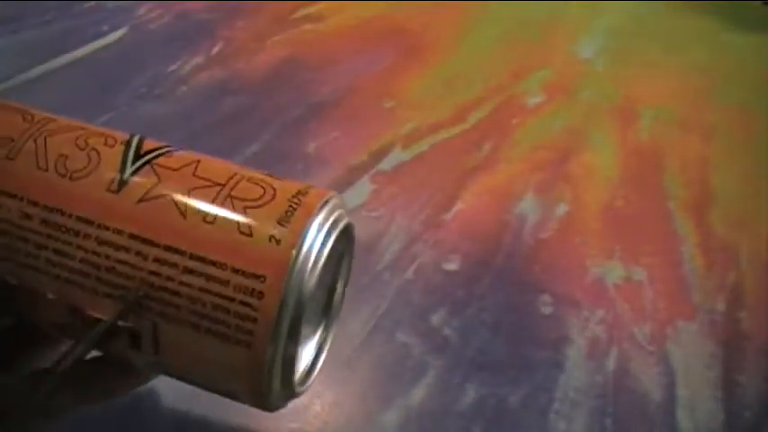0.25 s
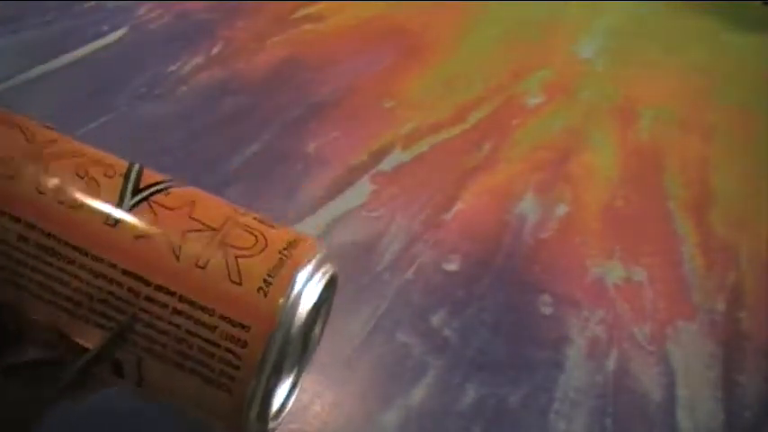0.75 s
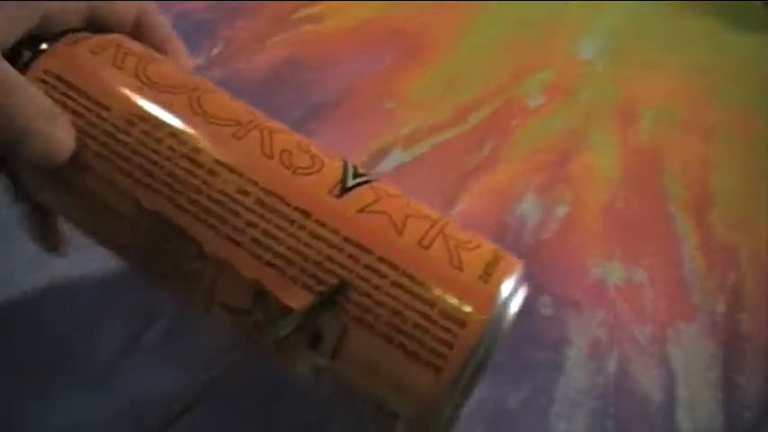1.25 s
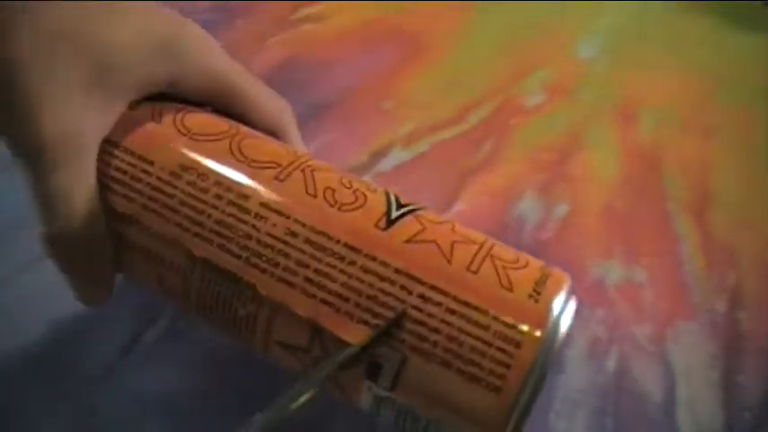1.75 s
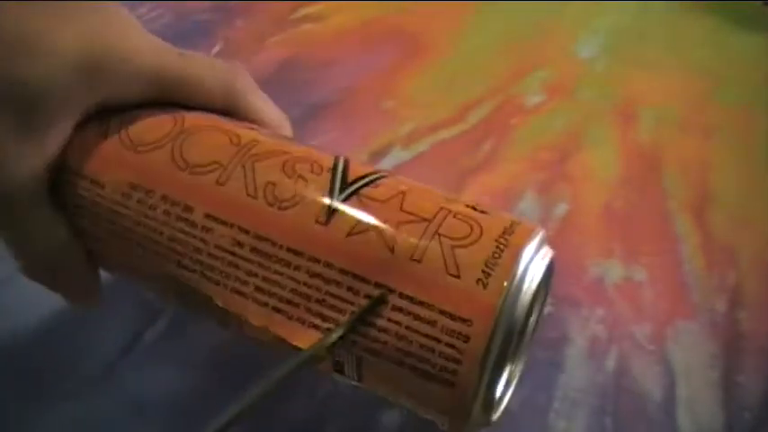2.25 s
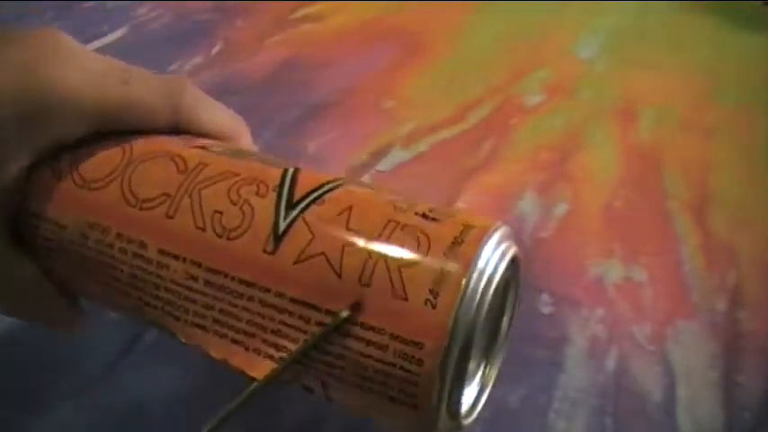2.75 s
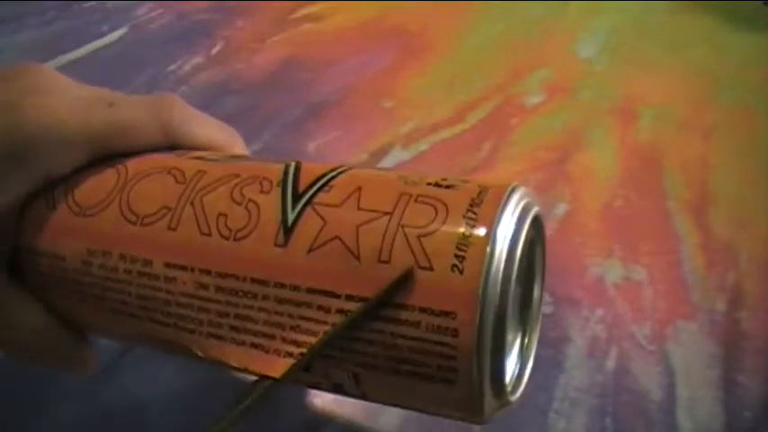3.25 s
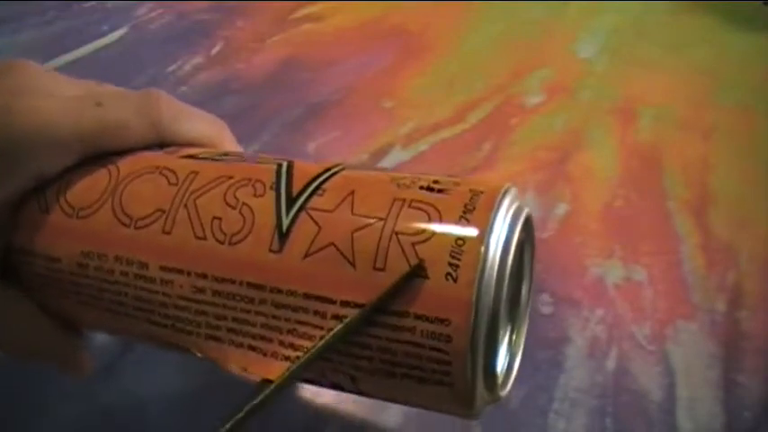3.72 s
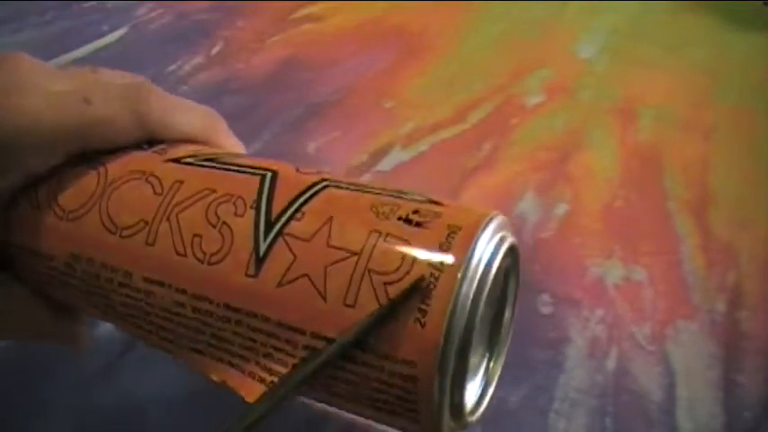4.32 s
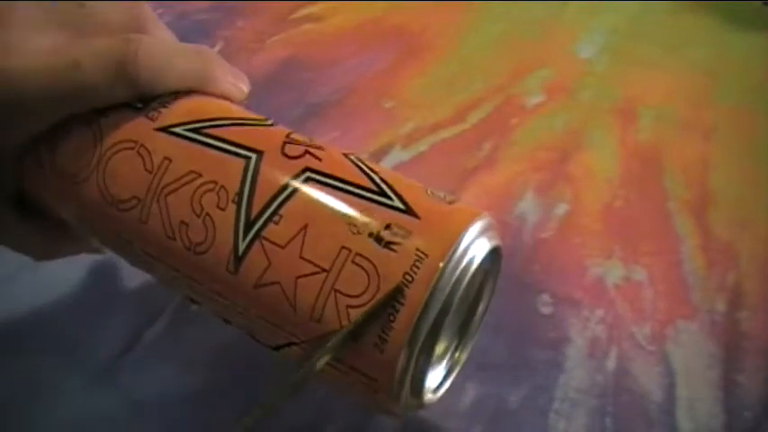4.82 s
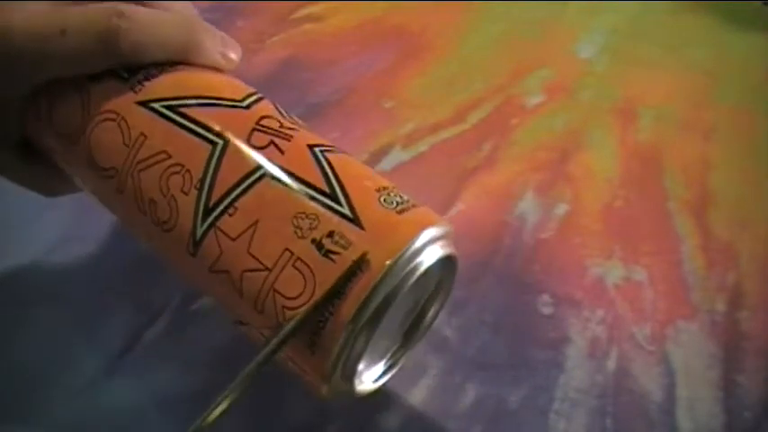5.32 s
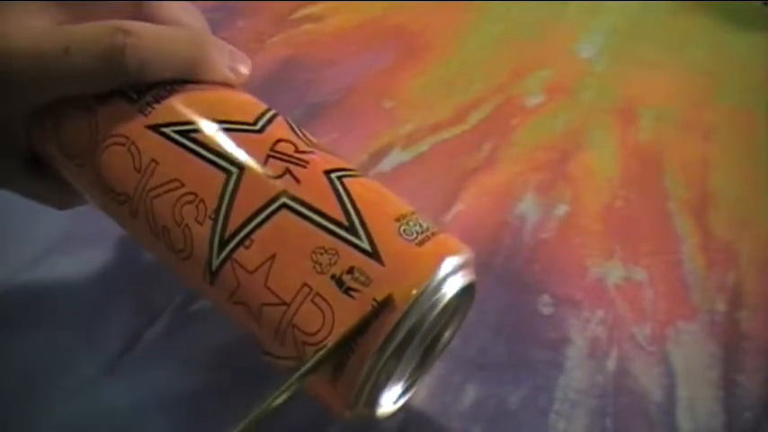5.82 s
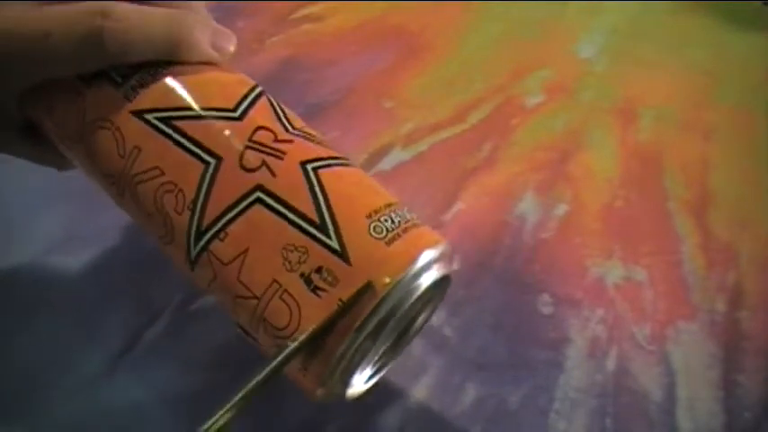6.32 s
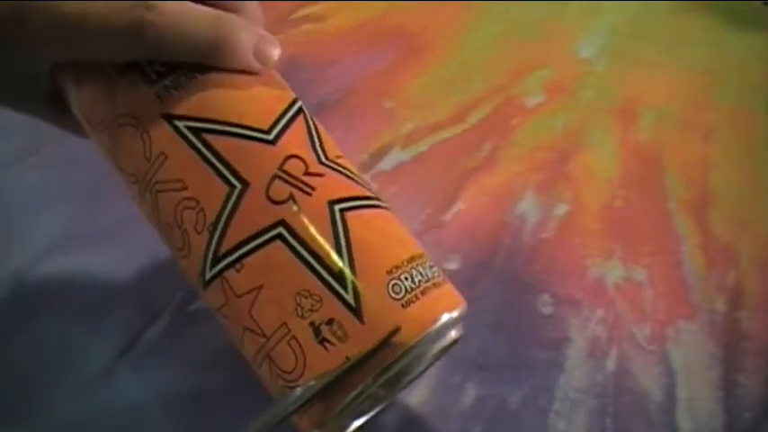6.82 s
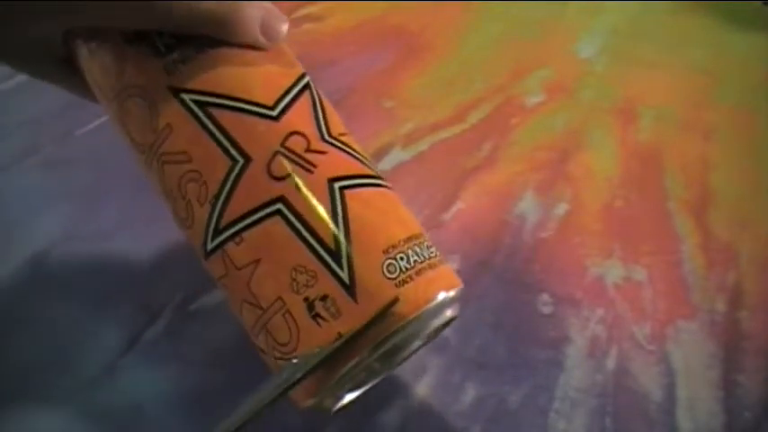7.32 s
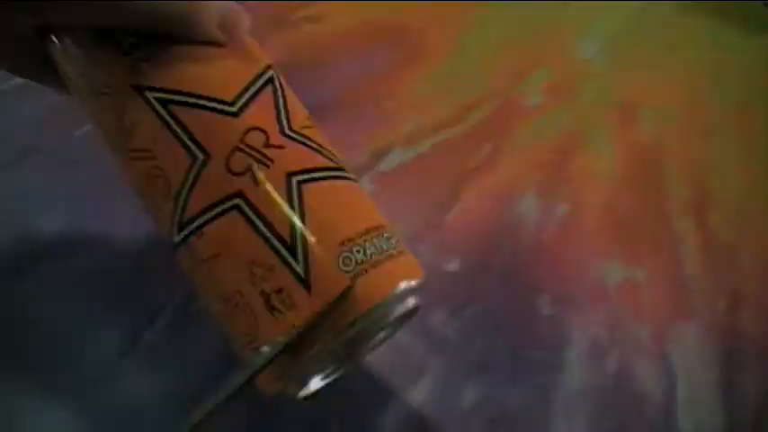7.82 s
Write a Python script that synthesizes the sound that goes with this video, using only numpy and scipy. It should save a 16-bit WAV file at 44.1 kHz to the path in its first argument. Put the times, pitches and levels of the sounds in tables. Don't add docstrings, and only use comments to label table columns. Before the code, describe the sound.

A close, dry-sounding metal can is cut by scissors in a small room, over constant faint hiss and low motor whir. A hollow click and short scrape open it, with light snips to 0.35 s. Two very loud tinny snaps hit near 0.65 and 0.69, then an airy hand rub runs until about 1.6, with pinging cracks at 1.04 and 1.19. Shearing strokes come at 1.8 to 2.05. From 2.2 to 3.5 it is busy: pops at 2.24 and 2.59, gritty rasps, small squeaks, a bright tear at 2.76, quick ticks. After a lull, cracks return at 3.86 and 3.94, a pop at 4.1, and sharp loud snaps from 4.36 to 4.76. Rapid small bites patter near 5.1, cracks at 5.63, snips to 6.0, a brief rub at 6.2, dull pops 6.4 to 6.6, a hard tear at 6.8, then loud cracks at 7.2, 7.44, 7.58 and 7.66, with a last pop at 8.0.

```python
import sys
import numpy as np
from scipy import signal
from scipy.fft import rfft, irfft, next_fast_len
from scipy.io import wavfile
from scipy.ndimage import uniform_filter1d

SR = 44100
rng = np.random.default_rng(int(sys.argv[2]) if len(sys.argv) > 2 else 0)


def unload_audio(sound):
    columns = np.transpose(np.atleast_2d(sound))
    steps = np.round(np.clip(columns, -1, 1) * 32767)
    wavfile.write(sys.argv[1], SR, steps.astype(np.int16))


def level_to_linear(level):
    exponent = np.asarray(level, float) / 20
    return 10 ** exponent


N = 355798

# frequency in Hz, level in dB per Hz.
HISS = [(24, -59), (60, -30), (100, -24), (181, -3), (417, -3.5), (707, -8.5), (763, -7), (957, -10),
        (2370, -16.5), (3050, -20.5), (3290, -22.5), (4800, -26), (6300, -31.5), (7000, -18.5), (7600, -26),
        (9400, -28), (10100, -24.5), (10800, -30), (16500, -62.5)]
HISS_DB = -52
# frequency in Hz, rms level in dB.
WHIR = [(117, -76), (175, -71.5), (217, -65), (292, -60), (351, -89.5), (409, -59.5), (466, -65),
        (526, -90.5), (3391, -73), (5480, -76.5), (15734, -98)]
# time in seconds, peak of the snap in dB, thud in dB.
THUDS = [(0.648, -5, -69), (0.69, 1, -69), (2.24, -5, -75), (2.586, -9, -69), (2.762, -10, -71),
         (3.859, 1, -68), (3.935, -7, -66), (4.357, 1, -48), (4.578, 0, -63), (4.633, 2, -68),
         (4.668, 6, -64), (4.76, 1, -70), (5.645, 0, -62), (6.437, -7, -77), (6.637, 4, -76),
         (7.192, 1, -73), (7.434, 1, -61), (7.575, 1, -78), (7.658, 0, -66), (8.0, -10, -76)]
# low edge in Hz, high edge in Hz, t60 in seconds, level in dB.
ROOM = [
    (196, 940, 0.54, -14.5),
    (1000, 3200, 0.35, -13.5),
    (3500, 7430, 0.34, -17),
    (7840, 20000, 0.31, -22.5),
]
# time in seconds, level in dB.
RUBS = [
    [(0.72, -45), (0.8, -42.5), (1.0, -44.5), (1.12, -54.5), (1.25, -43.5), (1.356, -51), (1.5, -40.5),
     (1.56, -56), (1.63, -61)],
    [(3.78, -70), (3.817, -58), (3.84, -72)],
    [(6.1, -59), (6.166, -68), (6.228, -45), (6.3, -53)],
    [(7.0, -88), (7.03, -79), (7.1, -49), (7.17, -72)],
]
# frequency in Hz, level in dB per Hz.
RUB_TONE = [(470, -57.5), (800, -39), (1300, 4), (2130, 4), (5000, 4), (6500, 2.5), (8500, 8), (11000, 0.5),
            (16000, -19)]

# frequency in Hz, level in dB.
METAL = [(50, -37.5), (200, -9), (330, -4), (450, 1), (1000, -4), (2500, -6.5), (5000, -4), (6700, -5.5),
         (8500, -1), (11000, -8.5), (13000, -13.5), (15800, -16), (16400, -41.5)]
# low edge in Hz, high edge in Hz, t60 after a snap in seconds.
BANDS = [
    (520, 2830, 0.063),
    (1230, 4800, 0.042),
    (5100, 13300, 0.033),
]
BODY, WALL, EDGE = BANDS
# frequency in Hz, level in dB, t60 in seconds.
CAN = [(782, -22, 0.058), (1100, -6.5, 0.21), (1340, -0.5, 0.0553), (2020, -13, 0.21), (2920, -7.5, 0.31),
       (4150, -7, 0.0091), (5120, -41, 0.18), (6420, -21, 0.041), (7340, -24.5, 0.16), (7400, -32, 0.16),
       (8183, -36.5, 0.97), (8840, -43.5, 5.0)]
CAN_SNAP_DB, CAN_STROKE_DB, CAN_SCATTER_DB = -13, -5, 10.5

# start in seconds, level in dB, pitch in Hz, t60 in
# seconds.
PINGS = [(.002, -24, 1950, .04), (.161, -35, 1940, .06), (.3, -37, 4650, .035), (.307, -28, 3050, .025),
         (.309, -31, 1960, .04), (.649, -29, 370, .05), (.649, -21, 2030, .05), (.691, -21, 2120, .05),
         (1.0432, -21, 2370, .04), (1.0442, -27, 1880, .05), (1.1882, -18, 9210, .028),
         (1.1886, -16, 3720, .025), (1.1892, -33, 3760, .07), (1.8152, -33, 480, .06),
         (1.8172, -22, 1885, .04), (1.9202, -22, 2920, .03), (1.9632, -23, 1410, .045),
         (1.9634, -33, 480, .08), (2.2212, -28, 2500, .025), (2.2412, -20, 1900, .055),
         (2.2792, -29, 2500, .03), (2.5862, -22, 810, .04), (2.5864, -22, 1400, .04),
         (2.5866, -28, 2010, .04), (2.5868, -28, 2700, .04), (2.5882, -30, 410, .1),
         (2.7752, -27, 3090, .09), (2.7802, -28, 420, .1), (3.0102, -32, 3000, .025),
         (3.0252, -33, 3000, .025), (3.3012, -33, 430, .05), (3.4702, -35, 2010, .06),
         (3.4712, -29, 3510, .05), (3.8602, -15, 8700, .018), (3.8612, -26, 2910, .03),
         (3.9352, -26, 1975, .045),
         (4.2802, -28, 1915, .15), (4.2902, -28, 470, .12), (4.5802, -16, 8800, .018),
          (4.6352, -29, 1275, .024), (4.6682, -27, 1310, .028), (4.6692, -23, 8260, .13),
          (4.6694, -35, 6400, .06), (5.4202, -41, 780, .04), (5.4502, -35, 830, .08),
          (5.4702, -34, 850, .06), (5.5002, -38, 700, .04), (5.6822, -23, 1088, .13),
          (5.6824, -30, 1490, .06), (5.6902, -29, 520, .06), (5.7632, -25, 1080, .07),
          (5.9992, -33, 445, .14), (6.0002, -27, 1100, .05), (6.3752, -23, 2890, .03),
          (6.3762, -25, 1985, .034), (6.3764, -30, 765, .07), (6.3782, -23, 1115, .045),
          (6.4392, -28, 4120, .05), (6.4394, -23, 1915, .04), (6.4422, -25, 2910, .045),
          (7.1942, -17, 1250, .03), (7.1944, -32, 565, .04), (7.1946, -19, 8100, .02),
          (7.5772, -20, 5200, .022), (7.6592, -17, 790, .05), (7.6594, -14, 1250, .035),
          (7.6596, -24, 2150, .04), (7.6598, -24, 2930, .04), (7.6602, -24, 605, .035),
          (7.7122, -27, 1200, .035), (8.0008, -24, 1370, .04), (8.001, -24, 2280, .04),
          (8.0012, -25, 7820, .025)]
KNOT_CYCLES = 6.03

# full bite in seconds, length in seconds, force in dB,
# pitch in Hz, brightness in dB.
SNIPS = [(.002, 0.11, -23, 1110, -8.5), (.312, 0.054, -30.5, 520, -8), (1.814, 0.028, -22.5, 540, 2),
         (1.92, 0.029, -14, 1174, -7.5), (1.967, 0.038, -21, 845, -1.5), (2.046, 0.016, -29, 664, -4.5),
         (2.845, 0.05, -32.5, 520, -14.5), (3.472, 0.04, -22.5, 497, 4.5), (4.152, .025, -20, 774, -2),
         (5.996, 0.049, -18, 1140, 1.5), (5.69, 0.066, -19, 1040, -10), (3.453, 0.013, -23.5, 410, -16),
         (7.775, 0.044, -34, 814, 0.5)]
# full bite in seconds, length in seconds, force in dB,
# pitch in Hz, brightness in dB.
RASPS = [(2.25, 0.082, -32, 600, -10), (2.39, 0.086, -34.5, 670, -18), (3.15, 0.091, -38.5, 764, -9),
         (3.49, 0.062, -32.5, 496, -1), (3.886, 0.087, -37.5, 900, 0.5), (4.285, 0.074, -23, 540, 7),
         (4.38, 0.17, -45, 535, 16.5), (4.64, 0.12, -40.5, 1210, 8), (4.77, 0.066, -32.5, 1190, 0),
         (5.05, 0.19, -36, 513, 4), (5.66, 0.052, -42.5, 583, 6), (6.87, 0.066, -31, 890, -4),
         (3.165, .03, -36, 1080, -6)]
# full bite in seconds, length in seconds, force in dB,
# pitch in Hz, brightness in dB.
SQUEAKS = [
    (2.345, 0.069, -34.5, 770, -13.5),
    (2.99, 0.071, -38.5, 560, -18),
    (3.115, 0.031, -26, 703, -18),
    (5.455, 0.048, -28, 826, -13.5),
    (5.79, 0.027, -39, 1050, -19),
]
# full bite in seconds, length in seconds, force in dB,
# pitch in Hz, brightness in dB.
JABS = [(.167, 0.014, -30, 900, -5), (.3, 0.013, -45, 1110, -11), (3.142, 0.014, -21.5, 660, -8.5),
        (3.199, 0.016, -23, 417, -2), (3.299, .014, -20, 448, -1), (3.272, 0.0089, -26, 420, -10),
        (5.048, 0.016, -26, 1030, 0), (5.078, 0.016, -37.5, 1000, 5), (5.094, 0.015, -32.5, 805, 5),
        (5.113, 0.013, -25.5, 1100, 0.5), (5.136, 0.012, -26.5, 1000, 6.5), (5.162, 0.012, -27, 1030, 7),
        (5.175, 0.016, -26, 1000, 4.5), (5.193, .016, -24, 1190, 5), (6.798, 0.02, -25.5, 735, -6.5),
        (6.813, .012, -26.5, 680, 3.5), (6.909, 0.01, -28, 754, -4), (6.93, 0.01, -31, 1090, -5),
        (6.633, 0.0073, -28, 700, -9), (7.784, 0.015, -27.5, 900, 3)]
# full bite in seconds, length in seconds, force in dB,
# pitch in Hz, brightness in dB.
TEARS = [
    (2.764, 0.0585, -25, 545, 8.5),
    (6.8, 0.06, -23, 782, 0.5),
]
# seconds to bite, extra lead as a share of the length, sag by the end in dB,
# seconds to let go, level of the wall in dB, level of the singing air in dB.
SNIP = (0.004, 0.46, -26, 0.01, 3, -28)
RASP = (0.013, 0.02, -7, 0.04, 4.5, -34)
SQUEAK = (0.045, -0.1, -2.5, 0.035, -1, -18)
JAB = (0.003, 0.56, -18.5, 0.008, 3, -22)
TEAR = (0.012, 0.09, -5, 0.014, 1.5, -21.5)
REST_DB, HALF_BITE_DB = -28, -8
WALL_FOLLOWS = 0.6
JUDDER_DB, HARD_JUDDER_DB = 3.0, 0.7

# time in seconds, strength in dB, pitch in Hz, tear in dB.
TICKS = [(0.101, -33.5, 344, -5), (2.203, -35.5, 640, -11), (2.259, -34, 555, 13), (2.266, -24, 570, 2),
         (2.29, -21.5, 432, 6), (2.311, -27, 586, -16), (2.339, -27, 770, -24), (2.377, -28, 766, -15),
         (2.389, -20.5, 815, -5), (2.841, -26, 550, -26), (2.988, -35, 485, -11), (3.024, -21, 553, -16),
         (3.046, -29, 546, -32), (3.067, -33, 580, -11), (3.088, -27.5, 590, -4), (3, -30, 517, -20),
         (3.103, -38, 637, -20), (3.116, -31, 694, -22), (3.124, -29.5, 754, -22), (3.133, -27, 705, -13),
         (3.186, -22, 494, -16), (3.235, -22, 1200, -17), (3.254, -26, 460, -5), (3.412, -37, 380, -21),
         (4.818, -31, 498, 2), (6.039, -34, 458, -13.5), (6.122, -59, 390, -11), (6.304, -30, 666, -3),
         (6.579, -26, 1120, -2.5), (7.353, -30, 1360, -8), (1.615, -52, 900, 11), (2.278, -28, 1290, -8),
         (2.359, -29, 795, -6), (2.416, -27, 900, -14), (3.081, -25, 564, -25), (3.095, -32, 595, -22),
         (3.11, -34, 650, -22), (4.005, -52, 900, 6), (4.065, -54, 900, 5), (7.76, -44.5, 900, 11),
         (7.926, -34, 1900, -18)]
# time in seconds, strength in dB, pitch in Hz,
# tear of the edge in dB, spread to the rest of the can in dB.
CRACKS = [(0.3247, -15, 1900, -31, -45), (0.3457, -27.5, 2950, -18, -9), (0.648, -3.5, 2170, -11, -12.5),
          (0.6906, 1, 2415, -8, -20.5), (1.042, -21, 2330, -1.5, 1), (1.1884, -15.5, 3500, -5, -42),
          (2.1518, -35, 1650, -1.5, -1.5), (3.8601, -29.5, 3500, 18.5, -6), (3.9356, -11.5, 2030, -5, -3.5),
          (4.3595, -3.5, 2200, 4.5, -17), (4.505, -13, 3560, 4, -28), (4.5796, -25, 2940, 15, -18),
          (4.6353, -13.5, 3800, 9.5, -15), (4.6686, -5, 4020, 2.5, -20), (4.7608, -8, 3500, 5, -11.5),
          (4.9422, -17.5, 3120, -2, -25), (4.9943, -30.5, 3200, 1.5, -7), (5.6218, -16, 2500, -17, -9.5),
          (5.6375, -16.5, 4250, 4.5, -20), (5.646, -10.5, 3880, 4.5, -15), (6.322, -28, 2290, 6.5, -3),
          (6.6383, -9, 3130, -0.5, -11.5), (7.1935, -6, 4330, -8.5, -13), (7.434, -18, 4400, -2, -10.5),
          (7.4437, -3.5, 4900, -13, -13), (7.576, -5, 3680, -6, -11.5)]
# time in seconds, strength in dB, pitch in Hz,
# tear of the edge in dB, spread to the rest of the can in dB.
POPS = [(0.001, -18, 1250, -8, -10), (0.157, -21, 427, -45, -40), (0.621, -26.5, 380, -20, -31),
        (1.458, -32, 1250, 15.5, 8), (2.221, -22, 640, -13, -8), (2.24, -9.5, 650, -13, -3.5),
        (2.586, -13, 407, -3, -13), (3.009, -20, 560, -15.5, -21), (3.223, -21, 380, 2, -17),
        (3.889, -12, 1220, -8, -12), (4.11, -11, 416, -1, -4), (4.614, -28.5, 1190, 15.5, 3),
        (5.763, -20.5, 1000, -10.5, -1.5), (6.373, -13.5, 496, -0.5, 1), (6.436, -12.5, 432, 2, 0),
        (6.501, -19.5, 490, -6, -7), (6.599, -25, 473, 1, 0), (7.4318, -10, 1320, -17, -1),
        (7.659, -3.5, 1180, -10.5, -4), (7.711, -17.5, 554, -20, -4), (8.0005, -12, 1136, -2, 2)]
# drive, edge drive, spread drive, and how clearly its pitch rings, all in dB.
CRACK = (3.5, 6, 4.5, -4.5)
POP = (1.5, 4, 3.5, -5.5)
TICK = (1, 1, 0, -2.5)
TICK_SPREAD, SPIKE_DB = 0.55, 8.5
RING_CYCLES, BODY_FROM = 6, 0.41
BREAK_T60_S, CRACK_BREAK_DB, POP_BREAK_DB = 0.0051, 4.5, -11


def tone(table, hz):
    f, db = np.transpose(table)
    return level_to_linear(np.interp(np.log(np.maximum(hz, 1)), np.log(f), db))


def coloured(table, channels):
    n = next_fast_len(N, True)
    gain = tone(table, np.fft.rfftfreq(n, 1 / SR))
    x = irfft(rfft(rng.standard_normal((channels, n))) * gain, n)[:, :N]
    return x / x.std()


def band(x, lo, hi):
    return signal.sosfilt(signal.butter(2, (lo, hi), "band", fs=SR, output="sos"), x)


def steep(x, lo, hi):
    b, a = signal.butter(2, (lo, hi), "band", fs=SR)
    return signal.lfilter(b, a, signal.lfilter(b, a, x))


def causal(x, table):
    cepstrum = irfft(np.log(tone(table, np.fft.rfftfreq(2048, 1 / SR))))
    cepstrum[1:1024] *= 2
    cepstrum[1025:] = 0
    response = irfft(np.exp(rfft(cepstrum)))[:1024]
    return signal.fftconvolve(x, response)[:N]


def add(out, x, s):
    i = int(s * SR)
    out[i:i + len(x)] += x[:len(out) - i]


def curve(rows):
    s, *columns = np.transpose(rows)
    t = np.arange(s[0], s[-1], 1 / SR)
    fade = np.clip(np.minimum(t - s[0], s[-1] - t) / 0.00437, 0, 1)
    return fade, [np.interp(t, s, c) for c in columns]


def dying(t60):
    return np.exp(-np.log(1000) / t60 * np.arange(int(0.16 * SR)) / SR)


def camcorder():
    t = np.arange(N) / SR
    mid, side = coloured(HISS, channels=2)
    hiss = mid + 0.45 * side * np.array([[1], [-1]])
    hiss = level_to_linear(HISS_DB) * hiss * level_to_linear([[0.8], [-0.8]])
    whir = 0
    for hz, db in WHIR:
        points = np.clip(rng.standard_normal((2, N // 3000)), -1.5, 1.5)
        level, phase = [np.interp(t, np.linspace(0, N / SR, len(p)), p) for p in points]
        line = np.sin(2 * np.pi * hz * t + 0.5 * phase)
        whir = whir + level_to_linear(db + 3.9 * level) * np.sqrt(2) * line
    return hiss + whir


def thuds():
    taps = np.zeros(N)
    for s, _, db in THUDS:
        taps[int(s * SR)] = level_to_linear(db + 58.0)
    return band(taps, 22, 200) * level_to_linear([[4.0], [-7.0]])


def room(x):
    t = np.arange(SR // 2) / SR
    tails = 0
    for lo, hi, t60, db in ROOM:
        mid, side = band(rng.standard_normal((2, len(t))), lo, hi)
        shape = 1000.0 ** (-t / t60) * np.clip(t / 0.00078, 0, 1)
        shape = level_to_linear(db) * shape / np.linalg.norm(shape)
        tails = tails + shape * (mid + 0.36 * side * np.array([[1], [-1]]))
    skew = level_to_linear(-24) * band(np.roll(x, 131) - np.roll(x, 347), 394, 6000)
    skew = skew + level_to_linear(-13) * band(np.roll(x, 9) - np.roll(x, 61), 7600, 17200)
    skew = skew + level_to_linear(-19.5) * band(x, 7000, 16000)
    direct = np.array([level_to_linear(-1.03) * x + skew, level_to_linear(-1.5) * x - skew])
    return direct + signal.fftconvolve(x[None], tails, axes=1)[:, :N]


def rub():
    out = np.zeros(N)
    for rows in RUBS:
        fade, (db,) = curve(rows)
        add(out, fade * level_to_linear(db), rows[0][0])
    return out * coloured(RUB_TONE, channels=1)[0]


def ring(hz, t60):
    decay = dying(t60)
    return np.sin(2 * np.pi * hz * np.arange(len(decay)) / SR) * decay


def wall(lo, hi, t60, break_db=-30):
    decay = 0.79 * dying(0.018) + dying(t60) + 0.11 * dying(5.8 * t60)
    decay = decay + level_to_linear(break_db) * dying(BREAK_T60_S)
    return steep(rng.standard_normal(len(decay)) * decay, lo, hi)


def can(damping):
    gains = level_to_linear(CAN_SCATTER_DB * rng.standard_normal(len(CAN)))
    gains = gains * np.sign(rng.standard_normal(len(CAN)))
    x = sum(g * level_to_linear(db) * ring(hz, damping * min(t60, 0.1)) for g, (hz, db, t60) in zip(gains, CAN))
    return x / np.linalg.norm(x)


def pings():
    out = np.zeros(N)
    for s, db, hz, t60 in PINGS:
        half_width = KNOT_CYCLES / t60
        knot = wall(max(hz - half_width, hz / 2), hz + half_width, t60)
        knot = knot / np.abs(knot).max() + 0.72 * ring(hz, 0.89 * t60)
        add(out, level_to_linear(db + 8.5) * knot, s)
    return out


def bites():
    kinds = (SNIPS, SNIP), (RASPS, RASP), (SQUEAKS, SQUEAK), (JABS, JAB), (TEARS, TEAR)
    for rows, (bite_s, share, sag_db, go_s, wall_db, sing_db) in kinds:
        for s, length, db, hz, edge_db in rows:
            start = max(s - bite_s - share * length, 0)
            end = s + length
            shape = [(start, db + REST_DB), ((start + s) / 2, db + HALF_BITE_DB), (s, db),
                     (end, db + sag_db), (end + go_s, db + sag_db + REST_DB)]
            yield shape, wall_db + WALL_FOLLOWS * edge_db, edge_db, hz, sing_db


def strokes():
    out = np.zeros(N)
    for rows, wall_db, edge_db, boom_hz, sing_db in bites():
        fade, (db,) = curve(rows)
        n = len(fade)
        force = np.clip((db + np.maximum(edge_db, wall_db) + 44.5) / 18, 0, 1)
        rate = 1200 * 10.0 ** force / SR
        judder = uniform_filter1d(np.repeat(rng.standard_normal(100), 220), 150)[:n]
        judder_db = (JUDDER_DB + (HARD_JUDDER_DB - JUDDER_DB) * force) * judder
        when, size, sign = rng.random((3, SR // 2))[:, :n]
        size_db = -3.2 * np.log(size + 0.0088) + judder_db - 5.0
        slips = (when < rate) * level_to_linear(size_db) * np.sign(sign - 0.5) * fade / np.sqrt(rate)
        held = [(0.31 * boom_hz, 2.32 * boom_hz, BODY[2]), WALL, EDGE]
        tap = np.arange(int(0.16 * SR)) == 0
        parts = [wall(lo, hi, 0.24 * t60) + 12.9 * steep(tap, lo, hi) for lo, hi, t60 in held]
        parts[0] = parts[0] / np.linalg.norm(parts[0]) + level_to_linear(sing_db) * ring(boom_hz, 0.055)
        parts[1] = parts[1] / np.linalg.norm(parts[1]) + level_to_linear(CAN_STROKE_DB) * can(0.24)
        for part, level_db in zip(parts, (db, db + wall_db, db + edge_db)):
            part = part / np.linalg.norm(part)
            add(out, signal.fftconvolve(slips * level_to_linear(level_db), part), rows[0][0])
    return out


def dents():
    ticks = [(*row, TICK_SPREAD * row[3]) for row in TICKS]
    kinds = (CRACKS, CRACK, True), (POPS, POP, False), (ticks, TICK, False)
    for rows, (drive_db, edge_db, spread_db, ring_db), high in kinds:
        for s, db, hz, tear_db, rest_db in rows:
            rest_db = rest_db + spread_db
            body_db, wall_db = (rest_db, 0) if high else (0, rest_db)
            yield s, db + drive_db, (body_db, wall_db, tear_db + edge_db), hz, ring_db, high


def snaps():
    spike = band(np.arange(64) == 8, 3000, 14000)
    spike = spike / np.abs(spike).max()
    out = np.zeros(N)
    for s, db, share_db, hz, ring_db, high in dents():
        if high:
            rows = BODY, (hz / 1.59, hz * 1.8, EDGE[2]), EDGE
            break_db, rise = CRACK_BREAK_DB, 12
        else:
            rows = (BODY_FROM * hz, *BODY[1:]), WALL, EDGE
            break_db, rise = POP_BREAK_DB, 36
        parts = [wall(*row, break_db) for row in rows]
        pop = sum(level_to_linear(d + 2.5) * p / np.abs(p).max() for d, p in zip(share_db, parts))
        cluster = wall(0.8 * hz, 1.2 * hz, 13.5 / hz ** 0.89)
        dent = 0.71 * ring(hz, RING_CYCLES / hz ** 0.72) + 0.9 * cluster / np.abs(cluster).max()
        pop = pop + level_to_linear(ring_db) * dent
        pop = pop + level_to_linear(CAN_SNAP_DB) * np.linalg.norm(pop) * can(0.57)
        pop[:64] += level_to_linear(share_db[2] + SPIKE_DB) * spike
        pop[:rise] *= np.linspace(0.2, 1, rise)
        add(out, level_to_linear(db) * pop, s)
    return out


def scene():
    metal = causal(snaps() + strokes() + pings(), METAL)
    return room(metal + rub()) + camcorder() + thuds()


def low_pass(x):
    return signal.sosfilt(signal.butter(12, 16660, fs=SR, output="sos"), x)


def record(dry):
    pole = 1 / (0.15 * SR)
    held = signal.lfilter([pole], [1, pole - 1], np.mean(dry ** 2, axis=0))
    x = dry / (1 + held / level_to_linear(-61.0)) ** 0.12
    clipped_off = x - np.clip(x, -0.85, 0.85)
    x = x - band(clipped_off, 250, 16000)
    x = signal.sosfiltfilt(signal.ellip(8, 0.1, 60, 16300, fs=SR, output="sos"), x)
    return low_pass(x)


dry = scene()
out = record(dry)
unload_audio(out)
```